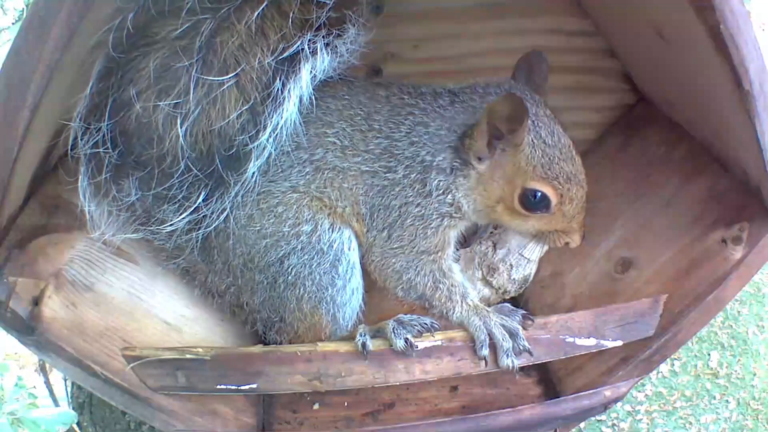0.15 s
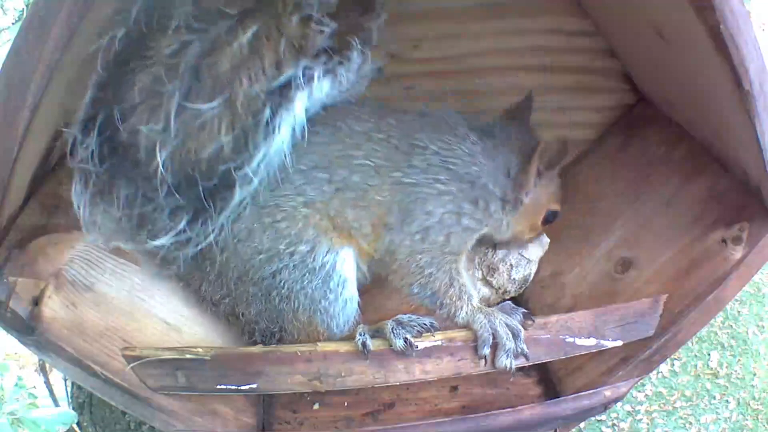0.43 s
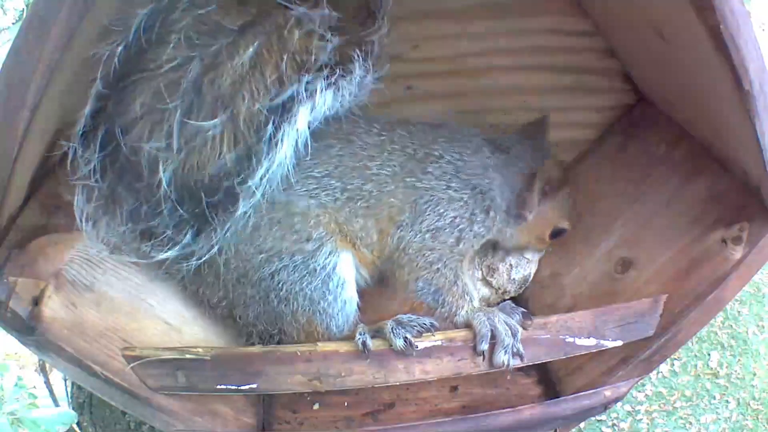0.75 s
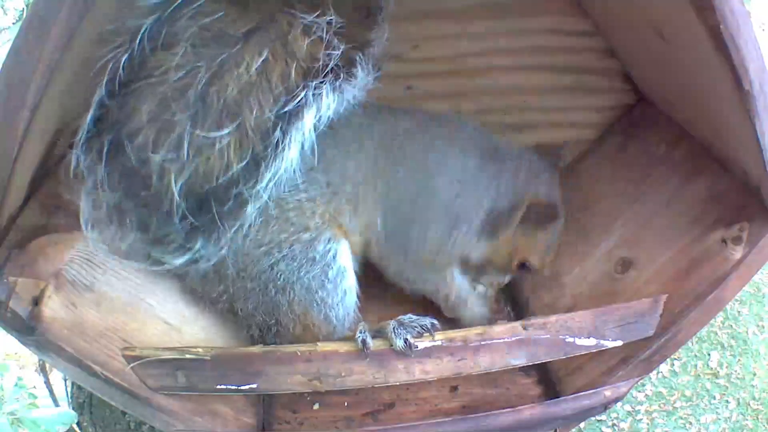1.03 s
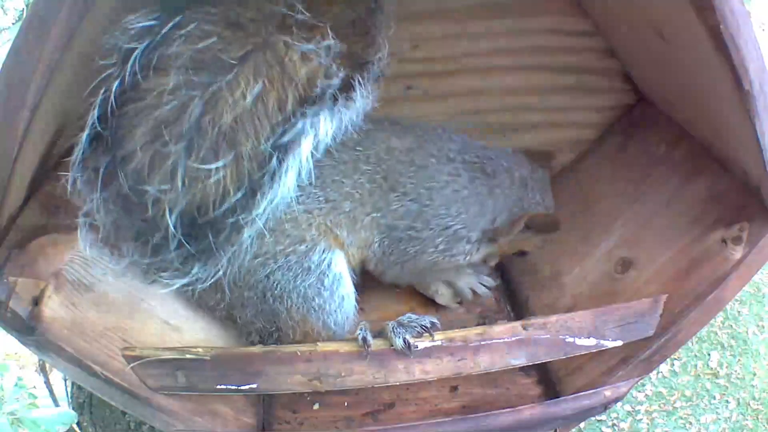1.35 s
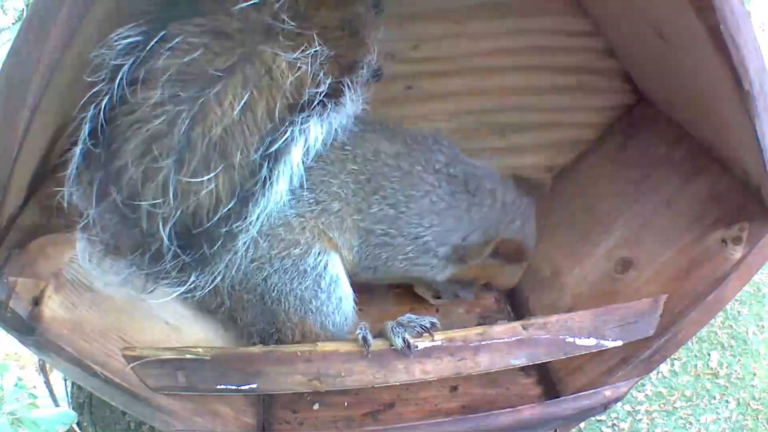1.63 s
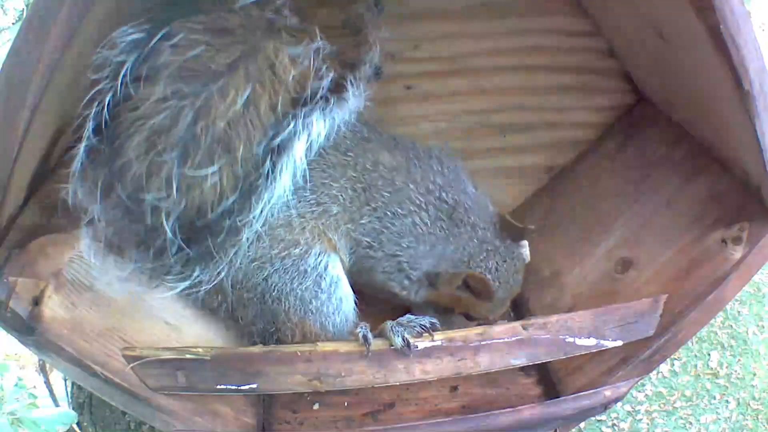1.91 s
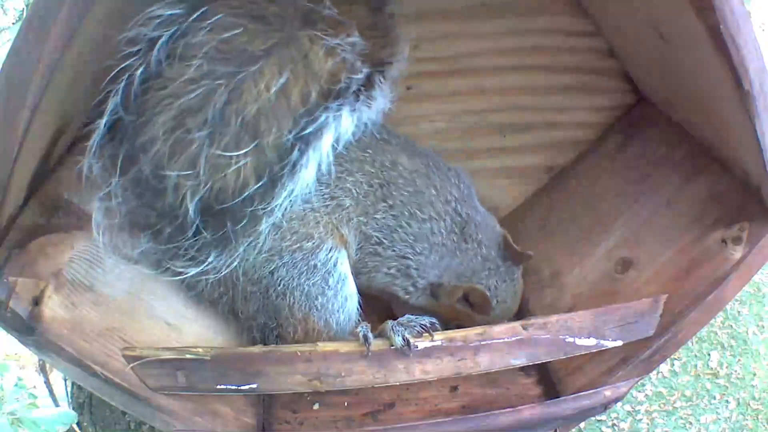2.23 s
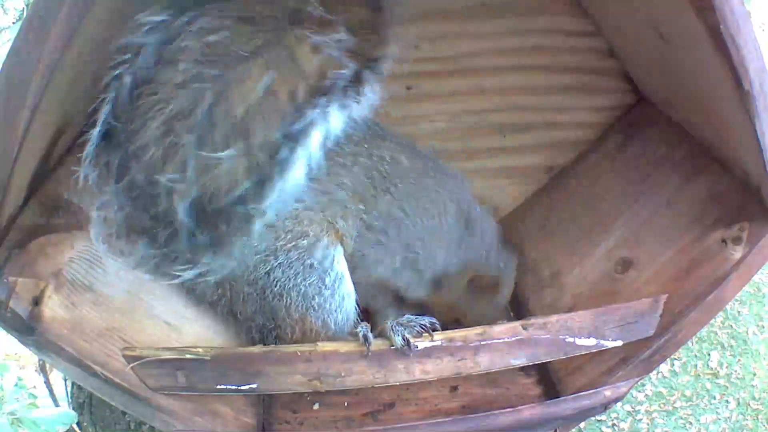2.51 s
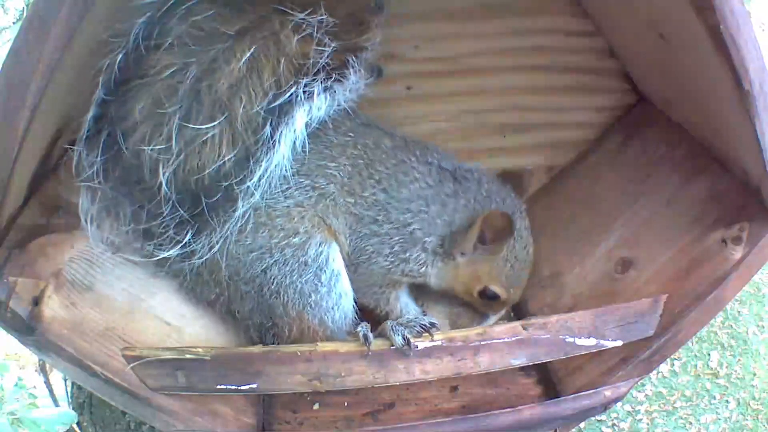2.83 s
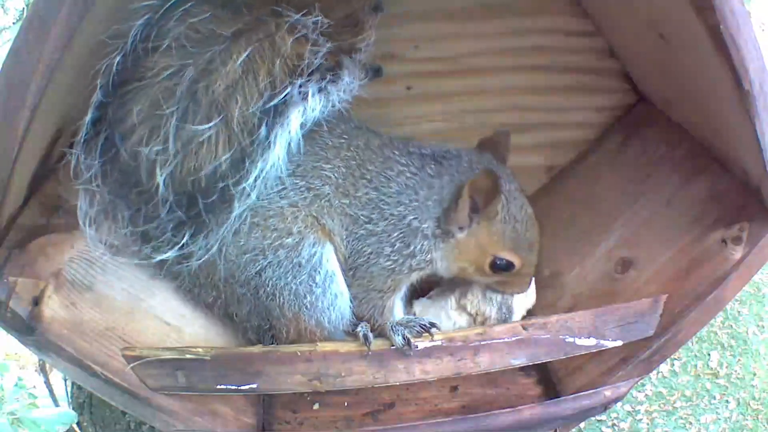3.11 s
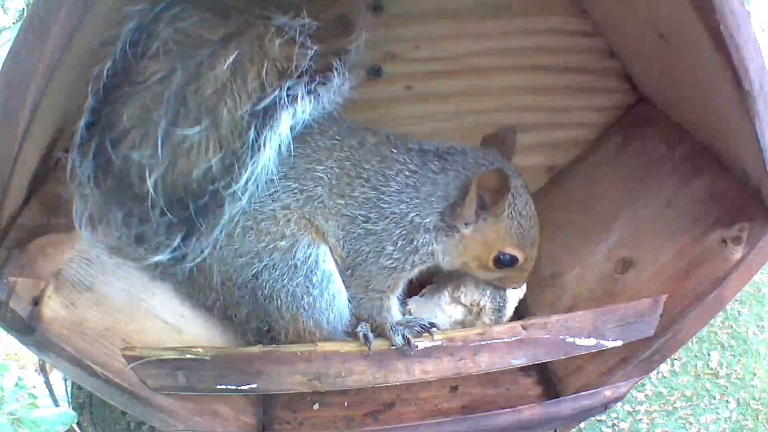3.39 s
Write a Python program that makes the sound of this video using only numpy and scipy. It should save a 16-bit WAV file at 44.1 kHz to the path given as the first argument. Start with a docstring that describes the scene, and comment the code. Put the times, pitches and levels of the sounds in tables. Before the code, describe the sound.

Bone knocked and gnawed against hollow wooden boards by a squirrel, low thuds over soft hiss

```python
"""A squirrel gnaws a bone against the boards of a small wooden box that carries the microphone.
Knocks and bites are short pushes that ring the modes of the box; chipping bone snaps as filtered crackle.
Paws rustle and teeth scrape as many tiny random pushes; the box sways on its mount as wavering tones
and rumble. A distant hum comes and goes.
A cheap camera adds hiss and a faint whine, cuts the treble and samples slowly."""
import sys
import numpy as np
from scipy import signal
from scipy.fft import rfft, irfft
from scipy.io import wavfile
from scipy.ndimage import uniform_filter1d

SR = 44100
rng = np.random.default_rng(int(sys.argv[2]) if len(sys.argv) > 2 else 0)


def unload_audio(sound):
    """Save the sound as a 16-bit wav file, at the path given as the first command line argument."""
    columns = np.transpose(np.atleast_2d(sound))
    # keep every value between -1 and 1, then stretch to whole-number steps
    steps = np.round(np.clip(columns, -1, 1) * 32767)
    wavfile.write(sys.argv[1], SR, steps.astype(np.int16))


def gain_from_db(level_db):
    """Turn a decibel level (scalar or array-like) into a linear amplitude factor."""
    decades = np.asarray(level_db, float) / 20
    return 10 ** decades


N = 156555  # length in samples

# Rocking of the box on its mount: start_s, sway_level_db, lowest_panel_level_db
ROCKING_LEVELS = [(0.0, -62.5, -81), (0.37, -50.5, -53), (0.71, -55, -71.5), (0.92, -43, -48.5),
                  (1.0, -47, -72), (1.13, -41, -41), (1.17, -44, -51), (1.78, -51, -57.5),
                  (1.86, -47.5, -39.5), (2.05, -55, -67.5), (2.17, -53, -34.5), (2.29, -41, -56),
                  (2.43, -61, -39.5), (2.55, -39.5, -53.5), (2.61, -48.5, -52), (3.0, -61, -59.5),
                  (3.29, -48, -43), (3.55, -65, -58.5)]
# A distant hum that comes and goes: start_s, level_db
HUM_LEVELS = [(0, -74), (2.3, -75), (2.45, -58), (2.9, -55.5), (3.0, -69), (3.25, -51), (3.35, -57),
              (3.55, -55.5)]
# Colour of the camera hiss: pitch_hz, relative_level_db
HISS_COLOUR = [(20, 10), (50, 9.5), (100, 11.5), (250, 10.5), (500, 3), (1000, 4), (2000, 1.5),
               (3500, -0.5), (4150, 4), (4530, 7), (4750, 4.5), (5100, -5.5)]
# Modes, the pitches at which the box rings: pitch_hz, relative_level_db, fade_by_60_db_s
BOX_MODES = [(101, -19, 0.36), (132.9, -0.5, 0.16), (150, 1, 0.24), (183.1, -11, 0.38), (229.7, -0.5, 0.22),
             (269.4, 2.5, 0.14), (318.7, -13, 0.2), (336.4, -1.5, 0.098)]
# Higher modes of the boards: pitch_hz, relative_level_db, fade_by_60_db_s
BOARD_MODES = [(397, -14, 0.037), (480.6, -14, 0.074), (503, -19.5, 0.022), (600.6, -14, 0.071),
               (674, -20.5, 0.013), (752, -16.5, 0.061), (815, -14.5, 0.039), (875, -6.5, 0.064),
               (952, -13, 0.062), (990, -19.5, 0.013), (1160, -17, 0.072)]
# Restless paws, before the walls: start_s, level_db
PAW_LEVELS = [(0.0, -102), (0.31, -56), (0.44, -59.5), (0.84, -53), (0.93, -52.5), (1.23, -42.5),
              (1.55, -51), (1.74, -51), (1.88, -42), (2.0, -54), (2.17, -54), (2.3, -50), (2.47, -38.5),
              (2.62, -55.5), (2.87, -60), (3.11, -54), (3.23, -40.5), (3.39, -60.5), (3.55, -63)]
# Scraping teeth, before the walls: start_s, level_db
SCRAPE_LEVELS = [(0.0, -91), (0.36, -69.5), (0.82, -92), (1.01, -60.5), (1.22, -68.5), (1.35, -71.5),
                 (1.56, -77), (1.79, -69), (1.96, -59), (2.17, -72.5), (2.28, -54.5), (2.81, -65),
                 (3.0, -59.5), (3.1, -65.5), (3.55, -63.5)]
# Soft knocks of body and bone, before the walls: start_s, low_level_db, middle_level_db, upper_level_db
KNOCKS_ON_BOX = [(0.267, -42.5, -57.5, -51), (0.333, -44, -26.5, -43.5), (0.348, -41, -38.5, -38),
                 (0.437, -54, -29, -50), (0.468, -41.5, -40, -68), (0.556, -52, -41, -47.5),
                 (0.709, -65, -39, -58), (0.792, -40, -40.5, -21), (0.824, -29.5, -30.5, -26),
                 (0.849, -44, -36.5, -27.5), (0.895, -40, -42.5, -52), (1.017, -40, -49.5, -70.5),
                 (1.075, -45, -35.5, -34.5), (1.1, -26, -31, -23), (1.111, -22.5, -37, -42),
                 (1.147, -34.5, -50.5, -33), (1.179, -27, -33.5, -31), (1.25, -39, -61, -42.5),
                 (1.295, -38, -43, -34.5), (1.323, -36.5, -30.5, -49), (1.35, -51, -46.5, -40),
                 (1.492, -27.5, -39, -53), (1.572, -46.5, -63, -39.5), (1.741, -43, -59, -37),
                 (1.786, -50, -32, -28), (1.834, -35, -44, -36.5), (1.85, -34.5, -36, -32.5),
                 (1.868, -42, -53.5, -54.5), (1.943, -45, -41.5, -36.5), (1.961, -38.5, -32, -47),
                 (2.019, -45, -66, -46), (2.108, -43, -27, -27), (2.129, -37.5, -33, -13),
                 (2.157, -33, -21.5, -43), (2.178, -33.5, -42, -43), (2.238, -42, -41.5, -53),
                 (2.29, -29.5, -29, -50), (2.319, -49, -49, -31), (2.351, -53, -49, -44),
                 (2.382, -31.5, -18, -46), (2.394, -43, -31.5, -22.5), (2.429, -29.5, -33.5, -36),
                 (2.435, -35, -31.5, -34), (2.473, -26.5, -45, -60.5), (2.562, -31, -27, -22.5),
                 (3.066, -42, -63, -43.5), (3.104, -32, -23.5, -31.5), (3.209, -46, -46, -53),
                 (3.255, -45, -31, -36), (3.267, -28, -51, -43)]
# Where the low, middle and upper levels of a knock apply: pitch_hz
KNOCK_PITCHES = [140, 225, 310]
# Bright snaps of chipping bone: start_s, peak_level_db, pitch_hz, fade_by_60_db_s
BONE_SNAPS = [(0.3305, -42, 3380, 0.0083), (1.11, -40.5, 1900, .002), (1.787, -42.5, 1640, .004),
              (2.133, -41.5, 1490, .004), (2.555, -43.5, 2240, .002)]
# Hard bites and scuffs, before the walls: start_s, low_level_db, middle_level_db, upper_level_db
BITES_ON_BOARDS = [(0.3335, -24.5, -24.5, -41), (0.44, -58, -45, -46), (0.558, -41, -51, -66),
                   (0.792, -39, -45, -74), (0.804, -31.5, -46, -62), (0.826, -40, -41, -47.5),
                   (0.847, -36.5, -45, -52), (0.891, -38, -45, -49), (1.077, -46, -42, -50),
                   (1.113, -34, -41, -27.5), (1.124, -36, -39, -45), (1.328, -36.5, -42, -39),
                   (1.765, -39, -51, -56), (1.783, -35, -43.5, -32), (1.793, -42, -42, -35),
                   (1.808, -45, -46, -48), (1.822, -59, -49, -43), (1.835, -34, -42, -34.5),
                   (1.892, -46, -56, -62), (1.941, -42, -44, -55), (1.975, -54, -39.5, -48),
                   (2.098, -29, -35, -32), (2.11, -34.5, -44, -28), (2.13, -25.5, -27, -30.5),
                   (2.144, -37, -42, -26), (2.164, -36, -50, -36), (2.178, -47.5, -49, -50),
                   (2.236, -53, -46, -44), (2.246, -45.5, -36.5, -39.5), (2.292, -45, -37, -45.5),
                   (2.318, -60, -49, -47), (2.328, -44, -52, -39), (2.357, -40, -45, -45),
                   (2.385, -45.5, -44, -55), (2.415, -52, -37, -47.5), (2.437, -30.5, -32.5, -40),
                   (2.459, -38, -51, -43.5), (2.552, -46, -36, -35), (2.562, -55, -45, -46),
                   (2.726, -49.5, -41, -46.5), (3.106, -61, -53, -40.5), (3.22, -46, -49, -48.5),
                   (3.236, -40, -46, -33), (3.255, -44, -45, -42)]
# Where the low, middle and upper levels of a bite apply: pitch_hz
BITE_PITCHES = [480, 680, 900]

KNOCK_BAND_HZ, BITE_BAND_HZ = [123, 317], [407, 1130]  # what the walls pass on to the microphone


def curve(rows, column=1):
    """Join a column of dB levels by straight lines over time and return it as gain."""
    table = np.array(rows, float)
    return gain_from_db(np.interp(np.arange(N) / SR, table[:, 0], table[:, column]))


def unit(x):
    """Scale a sound to an average (rms) strength of 1."""
    return x / np.sqrt(np.mean(x ** 2))


def walls(x, band_hz):
    """Pass only a band of pitches, as the walls do, which rounds the start of each blow."""
    return signal.sosfilt(signal.butter(3, band_hz, "bandpass", fs=SR, output="sos"), x)


def ring(x, hz, t60):
    """Ring one mode that fades by 60 dB in t60 seconds; a push of 1 rings with strength 1."""
    fade_per_sample = np.log(1000) / (max(t60, .001) * SR)
    pole = np.exp(2j * np.pi * hz / SR - fade_per_sample)
    return signal.lfilter([1], [1, -pole], x).imag


def waver(smooth_s):
    """Wander slowly at random: noise smoothed twice, scaled to rms 1."""
    width = int(smooth_s * SR)
    once = uniform_filter1d(rng.standard_normal(N), width)
    return unit(uniform_filter1d(once, width))


def swing(hz, wander_hz):
    """Swing at one pitch while both pitch and strength waver at random."""
    pitch = hz + wander_hz * waver(0.047)
    strength = gain_from_db(0.47 * waver(0.031))  # typical wavering in dB
    return strength * np.sqrt(2) * np.sin(2 * np.pi * np.cumsum(pitch) / SR)


def rumble(band_hz):
    """Make a dull band of noise with rms 1."""
    return unit(walls(rng.standard_normal(N), band_hz))


def rocking():
    """The mount and the lowest panel swing at their own pitches, wavering as the animal shifts."""
    sway_hz, sway_wander_hz, rumble_db = 31.1, 2.5, -9
    panel_hz, panel_wander_hz, thud_db = 71, 4.1, -4.5
    sway = swing(sway_hz, sway_wander_hz) + gain_from_db(rumble_db) * rumble([23, 62])
    panel = swing(panel_hz, panel_wander_hz) + gain_from_db(thud_db) * rumble([47, 140])
    return curve(ROCKING_LEVELS) * sway + curve(ROCKING_LEVELS, column=2) * panel


def distant_hum():
    """One low tone, wavering slightly in pitch and strength, comes and goes."""
    hum_hz, wander_hz = 186, 1.7
    return curve(HUM_LEVELS) * swing(hum_hz, wander_hz)


def camera_hiss():
    """The camera's steady hiss is random noise with its pitches weighted by a colour curve."""
    hiss_db = -55  # rms before the treble cut
    hz = np.fft.rfftfreq(N, 1 / SR) + 1  # the 1 avoids log of zero
    colour = np.array(HISS_COLOUR, float)
    gain = gain_from_db(np.interp(np.log(hz), np.log(colour[:, 0]), colour[:, 1]))
    gain = gain * (hz > colour[0, 0]) * (hz < 6000)
    return gain_from_db(hiss_db) * unit(irfft(rfft(rng.standard_normal(N)) * gain, N))


def camera_whine():
    """The camera's thin whine is one steady sine tone."""
    whine_hz, whine_db = 2099, -76
    return gain_from_db(whine_db) * np.sin(2 * np.pi * whine_hz * np.arange(N) / SR)


def grains(per_s, modes):
    """Many tiny random pushes of uneven size ring the modes, each push weighting them anew."""
    grain_db = 4  # typical spread in size
    happens = rng.random(N) < per_s / SR
    pushes = happens * gain_from_db(grain_db * rng.standard_normal(N))
    out = np.zeros(N)
    for hz, level_db, t60 in modes:
        out += gain_from_db(level_db) * ring(pushes * rng.standard_normal(N), hz, t60)
    return unit(out)


def paw_rustle():
    """Restless paws push lightly on the box, about 140 times a second."""
    return walls(curve(PAW_LEVELS) * grains(140, BOX_MODES), KNOCK_BAND_HZ)


def tooth_scrape():
    """Scraping teeth catch on the boards, about 440 times a second."""
    return walls(curve(SCRAPE_LEVELS) * grains(440, BOARD_MODES), BITE_BAND_HZ)


def strike(events, level_hz, modes, contact_s, count):
    """Each blow is one push, or several in quick succession, that rings all the modes."""
    scatter_db, chatter_s = 2.5, 0.00796  # uneven mode levels; a blow of several pushes lasts up to this long
    blows = np.array(events, float)
    scatter = scatter_db * rng.standard_normal((len(blows), len(modes)))
    lag = rng.random((len(blows), count))  # as a share of the chatter time
    lag[:, 0] = 0
    # Later pushes go either way and weaken with their lag.
    either_way = 1.32 * rng.choice([-1., 1.], lag.shape)
    size = np.exp(-1.2 * lag) * np.where(lag > 0, either_way, .8)
    at = ((blows[:, :1] + chatter_s * lag) * SR).astype(int)
    out = np.zeros(N)
    for k, (hz, mode_db, t60) in enumerate(modes):
        # The three levels of each blow are joined by lines along pitch.
        blow_db = np.array([np.interp(np.log(hz), np.log(level_hz), row[1:]) for row in blows])
        level_db = blow_db + mode_db + scatter[:, k]
        pushes = np.zeros(N)
        np.add.at(pushes, at, gain_from_db(level_db)[:, None] * size)
        out += ring(pushes, hz, t60)
    contact = np.hanning(int(contact_s * SR) + 3)  # a softer contact lasts longer
    return np.convolve(out, contact / contact.sum())[:N]


def knocks():
    """Body and bone knock softly on the box, one push each."""
    blows = strike(KNOCKS_ON_BOX, KNOCK_PITCHES, BOX_MODES, contact_s=0.0012, count=1)
    return walls(blows, KNOCK_BAND_HZ)


def bone_snaps():
    """Chipping bone gives a few ms of crackle that swells and dies, through one resonance."""
    swell_s = 0.0025
    out, n = np.zeros(N), np.arange(SR // 50)
    for start_s, peak_db, hz, t60 in BONE_SNAPS:
        crackle = rng.standard_normal(len(n)) * n * np.exp(-n / (swell_s * SR))
        burst = ring(crackle, hz, t60)
        out[int(start_s * SR) + n] += gain_from_db(peak_db) * burst / np.abs(burst).max()
    return out


def bites():
    """Hard bites and scuffs judder on the boards, five quick pushes each."""
    blows = strike(BITES_ON_BOARDS, BITE_PITCHES, BOARD_MODES, contact_s=0.00069, count=5)
    return walls(blows, BITE_BAND_HZ)


def scene():
    """Add up the rocking, hum, paws, teeth, knocks and snaps."""
    moving = rocking() + distant_hum() + paw_rustle() + tooth_scrape()
    return (moving + knocks() + bone_snaps() + bites())[None]


def roll_off(x):
    """The treble ends steeply here."""
    return signal.sosfilt(signal.butter(12, 15620, fs=SR, output="sos"), x)


def record(dry):
    """Add camera noise, cut the treble, and join slow samples by lines, which mirrors sound up high."""
    top_hz, camera_sr = 5030, 16000  # treble limit in Hz; samples per second
    noisy = dry[0] + camera_hiss() + camera_whine()
    treble_cut = signal.ellip(10, .1, 45, top_hz, fs=SR, output="sos")
    dull = signal.sosfiltfilt(treble_cut, noisy)  # run forwards and backwards, so it cuts twice
    slow = signal.resample_poly(dull, 160, 441)  # 44100 to 16000 samples per second
    mix = np.interp(np.arange(N) / SR, np.arange(len(slow)) / camera_sr, slow)
    return roll_off(mix[None])


dry = scene()
out = record(dry)
unload_audio(out)
```